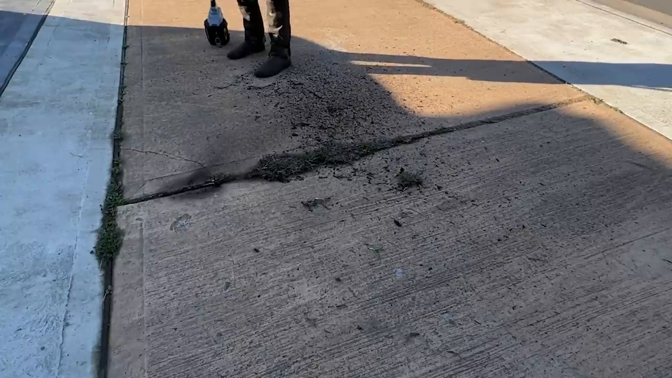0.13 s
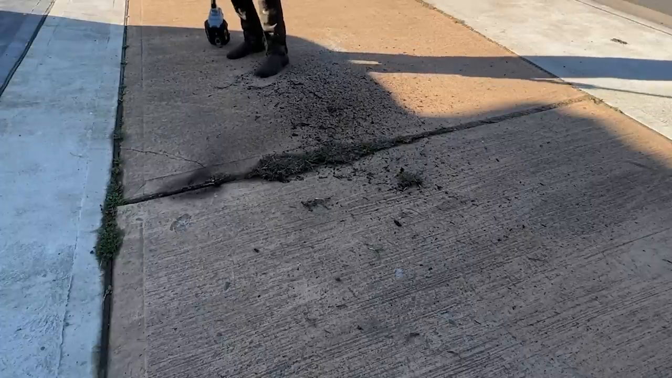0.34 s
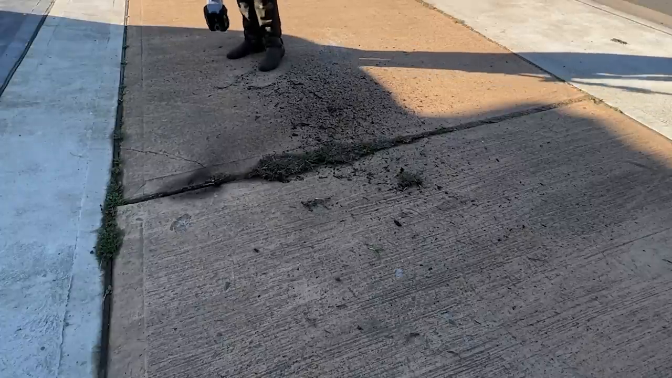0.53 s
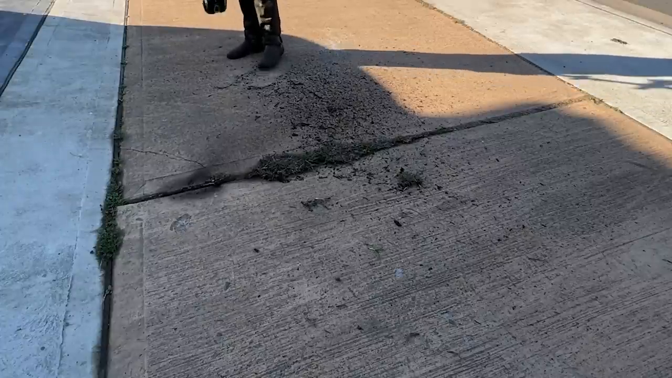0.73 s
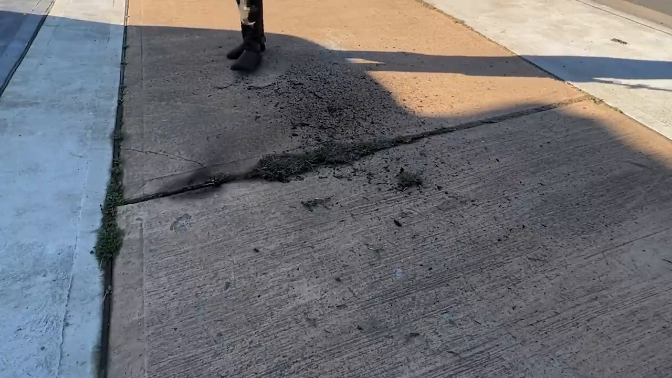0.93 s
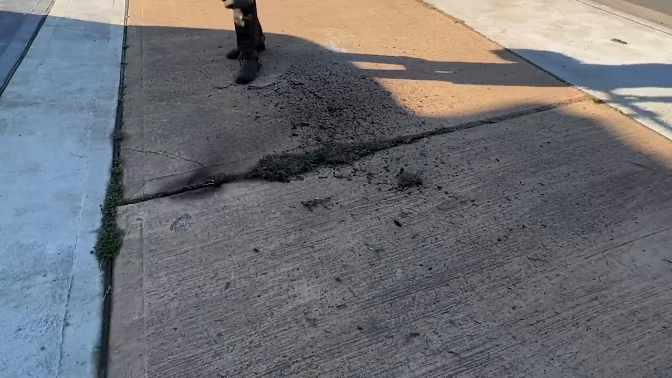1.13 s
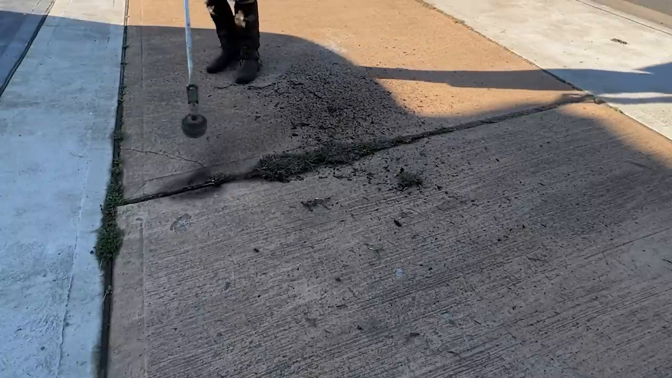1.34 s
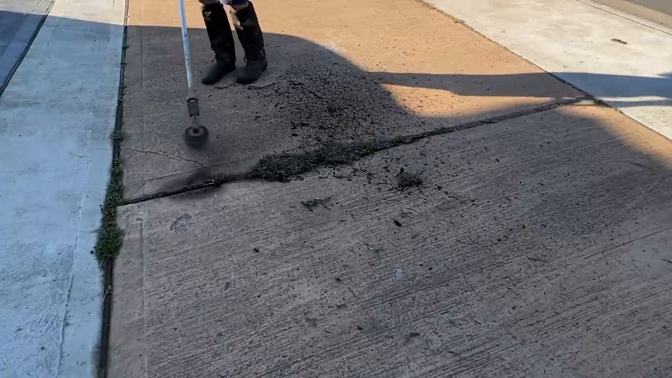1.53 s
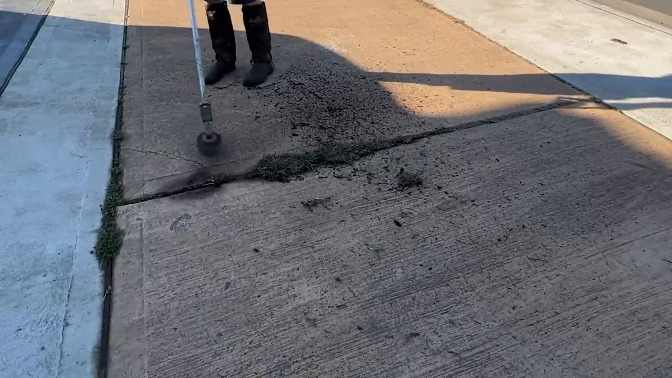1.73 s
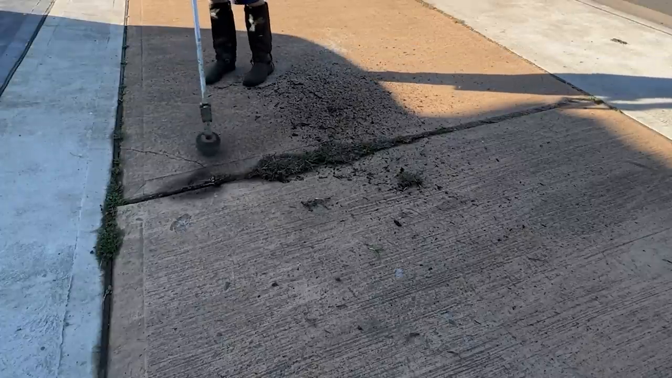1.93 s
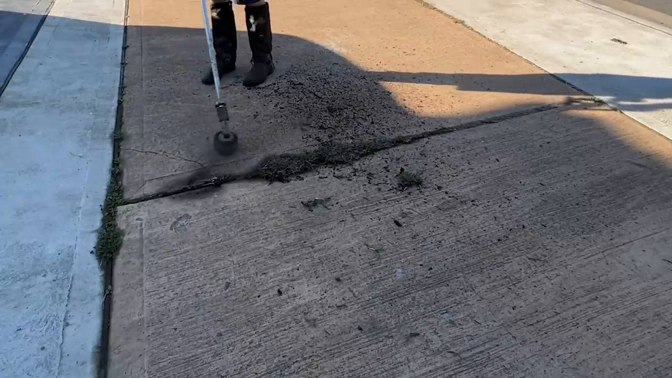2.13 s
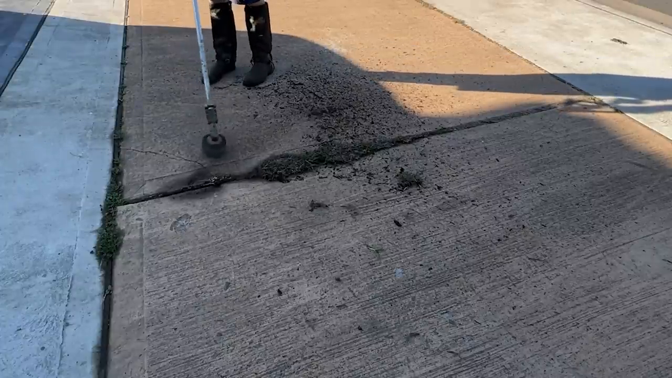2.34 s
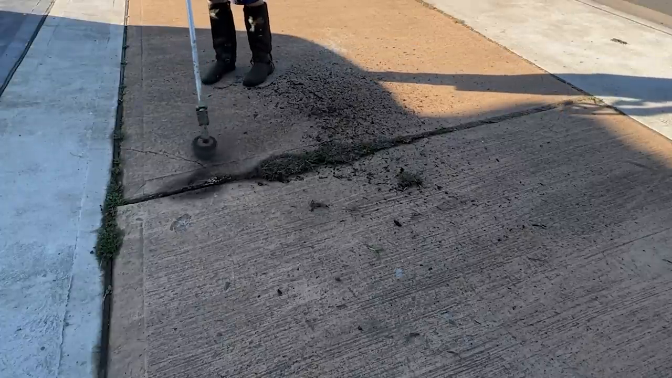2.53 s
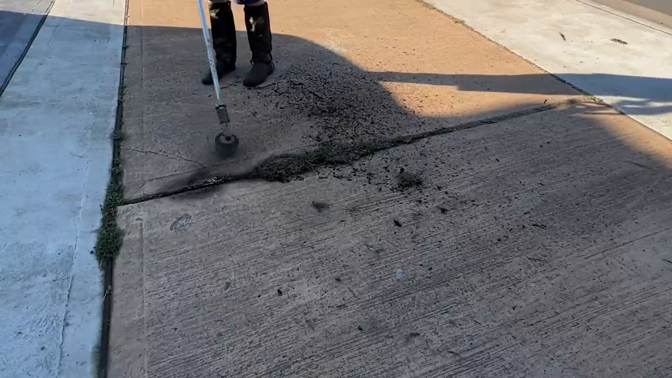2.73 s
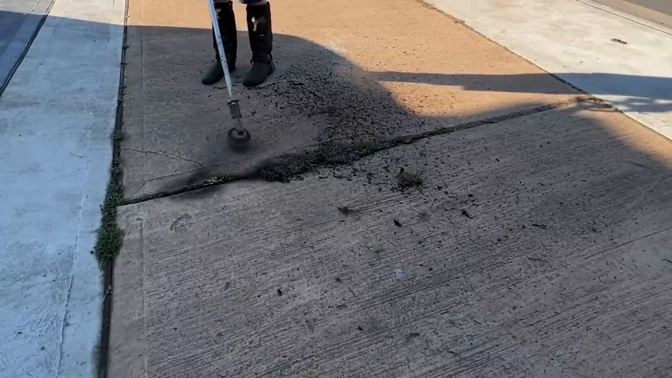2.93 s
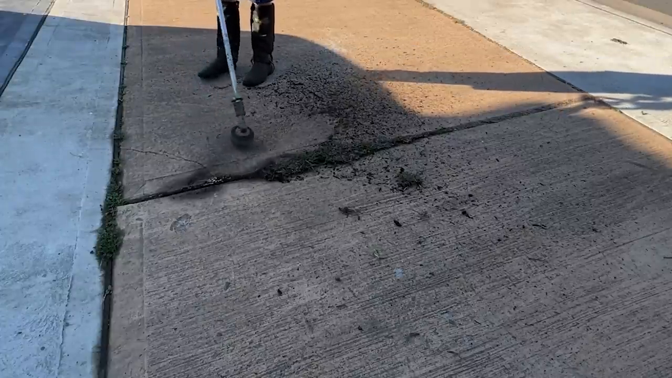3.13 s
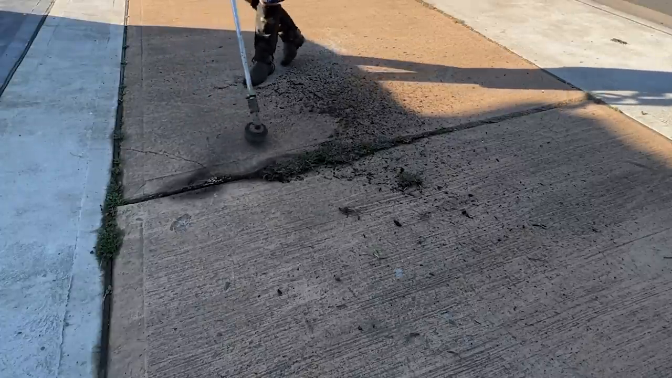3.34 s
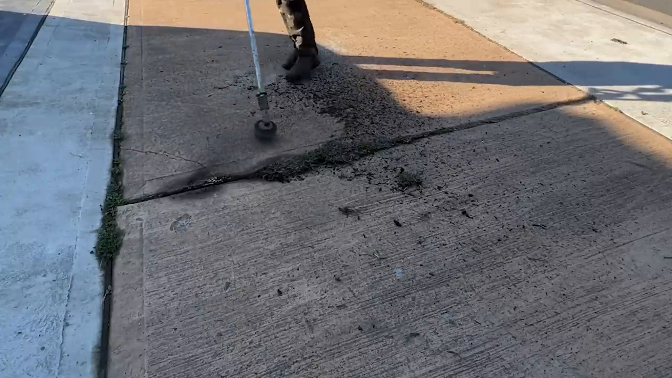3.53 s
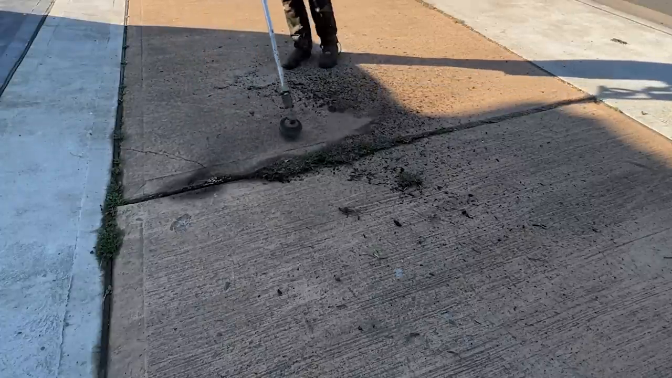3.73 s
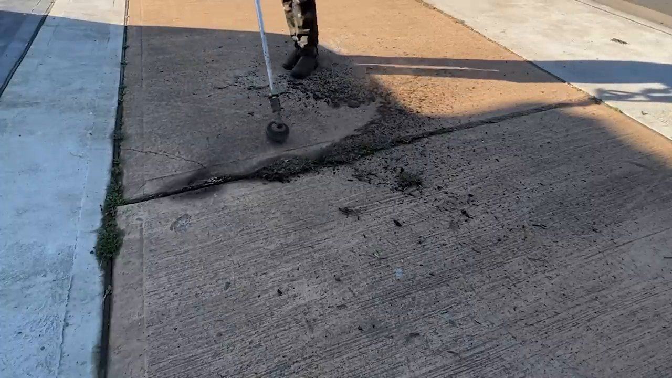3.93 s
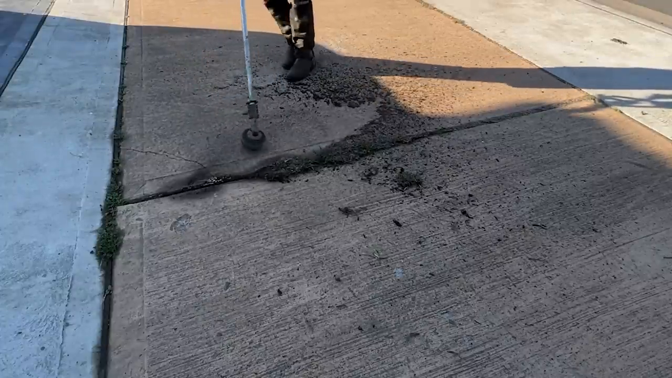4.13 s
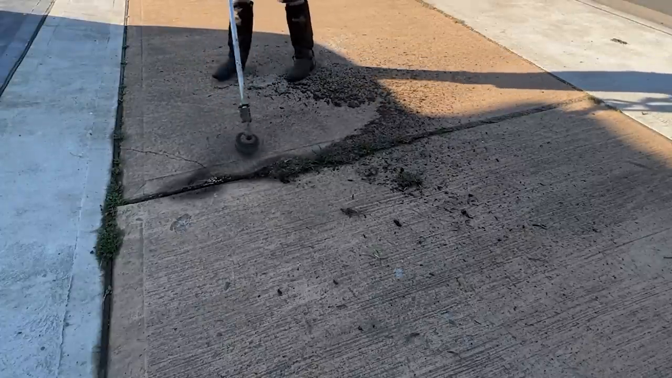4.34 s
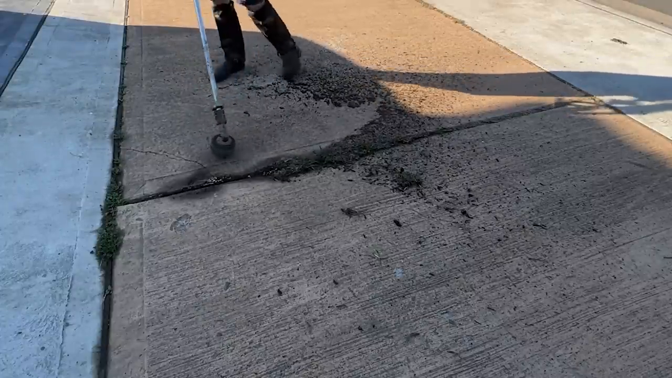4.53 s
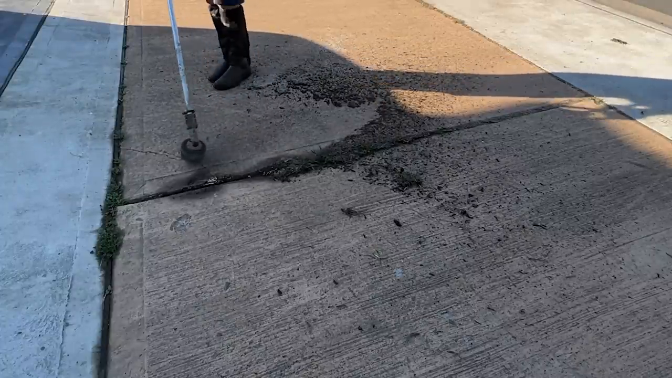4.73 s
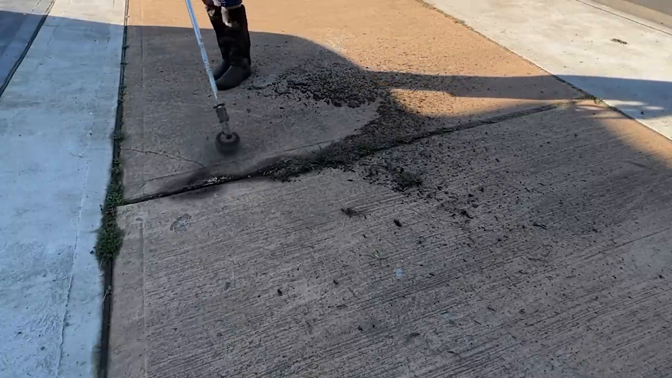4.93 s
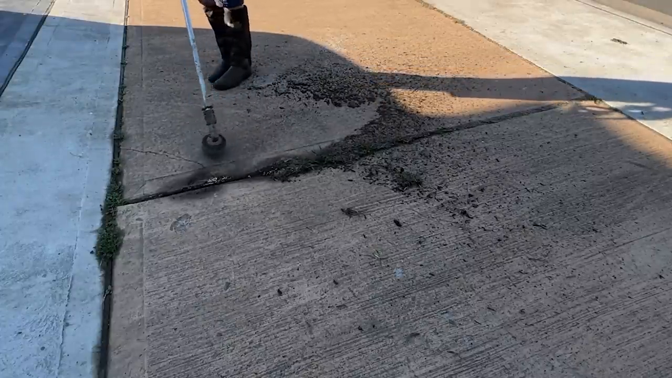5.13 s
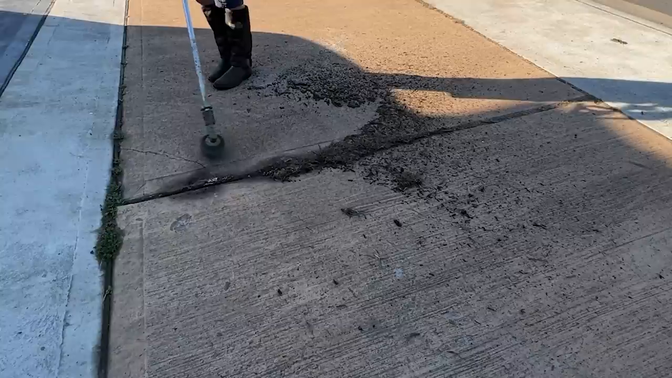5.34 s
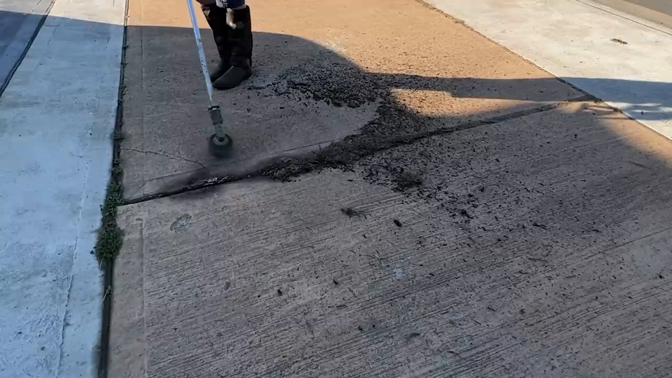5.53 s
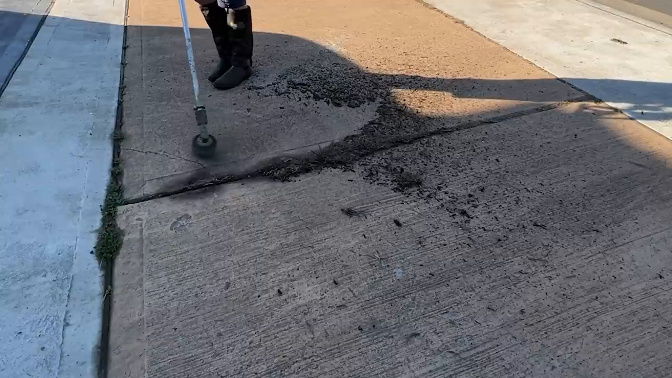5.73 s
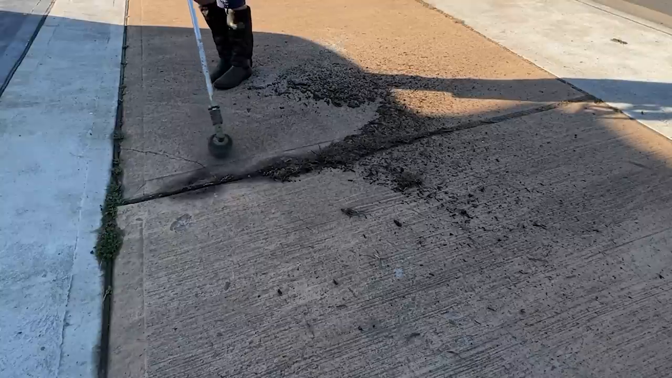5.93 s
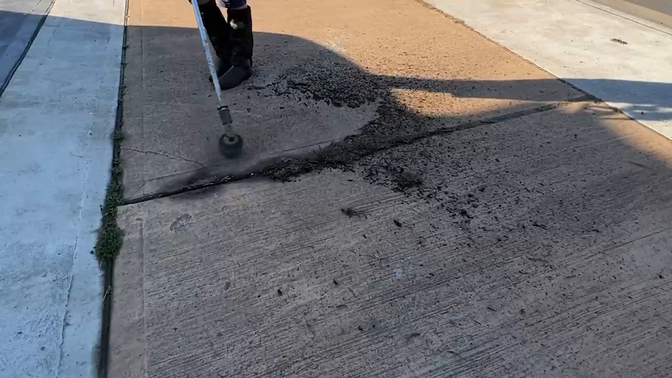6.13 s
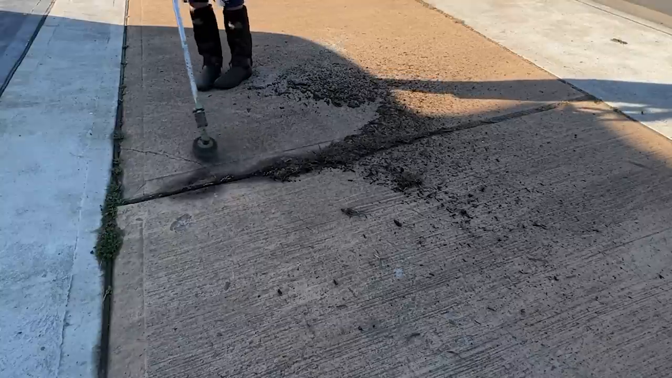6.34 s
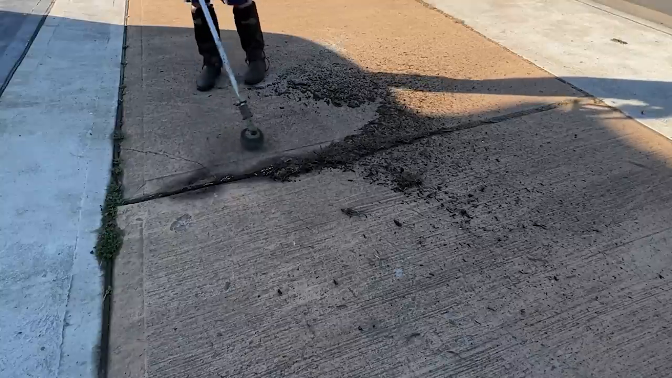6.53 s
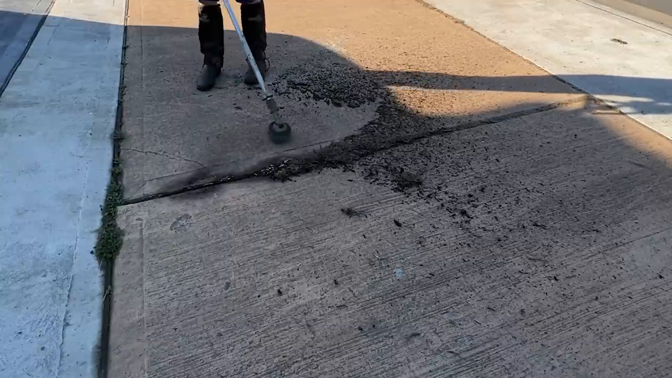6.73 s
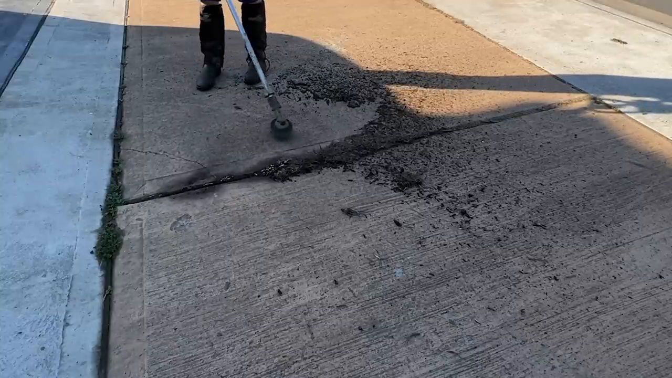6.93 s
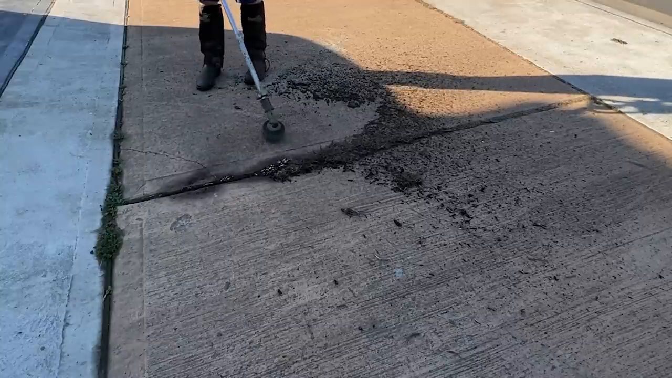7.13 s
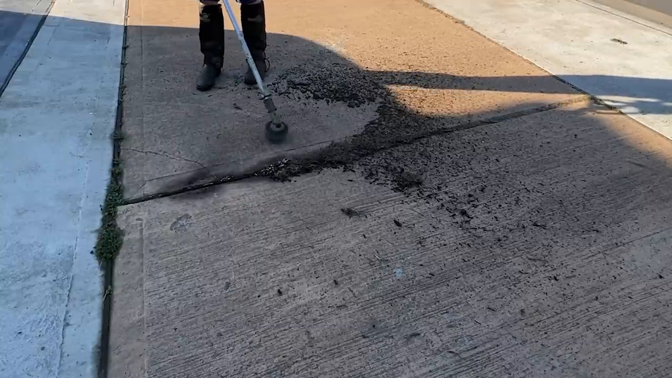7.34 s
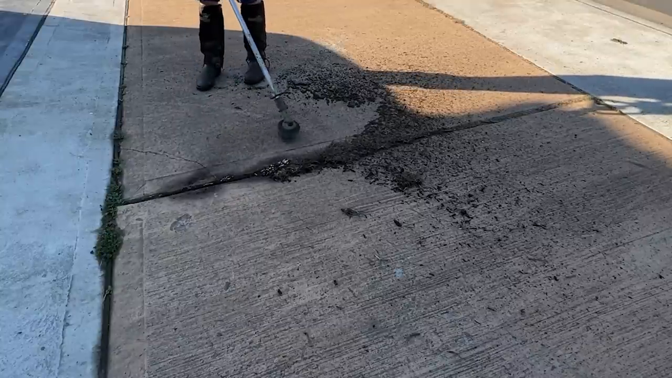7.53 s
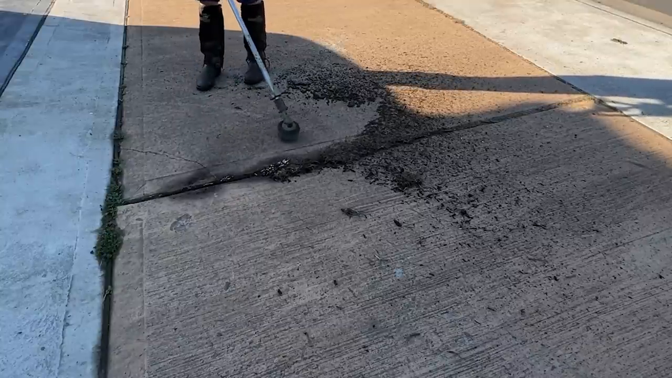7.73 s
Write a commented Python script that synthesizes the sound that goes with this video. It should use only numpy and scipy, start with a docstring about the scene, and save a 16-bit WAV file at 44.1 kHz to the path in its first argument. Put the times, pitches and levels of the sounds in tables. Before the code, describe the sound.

Boots scuff gritty concrete, then an electric string trimmer squeaks, jolts and spins up to a bright hissing whine that flutters as it bites weeds.

```python
"""Electric string trimmer over concrete

Boots shuffle first, as shaped noise; a stalled rotor squeaks and jolts, as short sines and a decaying burst.
The shaft then runs up: gear whine and line drone are sines locked to its phase. The line's vortex whistle
is noise that slides with speed, combed by an echo off the concrete; fan rush and grit are further noise.
Weeds drag the speed down and raise the noise, and a far wash with a low hum lies behind it all."""
import sys
import numpy as np
from scipy import signal
from scipy.io import wavfile
from scipy.ndimage import uniform_filter1d

SR = 44100
rng = np.random.default_rng(int(sys.argv[2]) if len(sys.argv) > 2 else 0)


def log_audio(samples):
    """Write samples as a 16-bit WAV file to the path given in sys.argv[1]."""
    # one column per channel
    frames = np.atleast_2d(samples).T
    # limit to full scale, then quantise
    limited = np.clip(frames, -1, 1)
    pcm = np.round(limited * 32767).astype(np.int16)
    wavfile.write(sys.argv[1], SR, pcm)


N = 343539
HOP = 128  # samples between frames; each frame spans four hops
T = np.arange(N) / SR
FRAME_T = np.arange(N // HOP + 5) * HOP / SR
HZ = np.fft.rfftfreq(4 * HOP, 1 / SR)[:, None]

# Tone and band levels are nominal, before random shaking; spectral densities are relative within each noise.

# Stereo spread, side channel against mid: pitch_hz, side_db
STEREO_WIDTH = [(2200, -65), (2700, -19), (3300, -15), (5500, -13), (9000, -12), (15000, -3)]

# Distant neighbourhood, spectrum: pitch_hz, density_db_per_hz
YARD_SPECTRUM = [(12, -44), (20, 5), (135, -5.5), (357, -10), (841, -7), (1880, -12.5), (2160, -14),
                 (5380, -33), (12400, -45), (15000, -71)]
YARD_LEVEL_DB = -56
# Hum of a distant machine: pitch_hz, level_db
DISTANT_HUM = [(70, -70), (141, -64)]

# Soles dragged on gritty concrete: start_s, loudest_s, end_s, sole_peak_db, crunch_peak_db
SHUFFLES = [(0.0, 0.035, 0.038, -58, -58), (0.04, 0.17, 0.29, -50.5, -63),
            (0.373, .47, 0.583, -46.5, -51.5), (.76, 0.897, 1.05, -53, -60.5)]
SWELL_DB, EDGE_S = -6.5, 0.012  # level at a drag's start and end against its loudest; fade beyond them
# Resonances of the shuffle, each broadened later by 80 Hz: pitch_hz, width_hz, level_db (relative)
SOLE_RINGS = [(544, 54, 2.5), (990, 38, -6), (1790, 76, -3.5), (2500, 83, -27)]
# Crushed grit underfoot, spectrum: pitch_hz, density_db_per_hz
CRUNCH_SPECTRUM = [(1800, -29), (2800, 1.5), (4800, -4), (6500, -12), (9000, -23), (15000, -50)]
# Single grains crushed underfoot: peak_s, pitch_hz, peak_db
GRAIN_TICKS = [(.03, 5600, -61), (.25, 7000, -67), (.367, 5500, -60), (.627, 6160, -63),
               (.752, 3980, -53.5)]
TICK_HALF_S, TICK_SPREAD = 0.0086, 0.29  # half length; half width as a share of pitch

# Stalled rotor squeaking as it breaks loose: peak_s, half_length_s, pitch_hz, peak_db
ROTOR_SQUEAKS = [(1.07, 0.006, 3370, -41), (1.087, 0.0092, 3335, -34.5), (1.107, .007, 3260, -43)]
# Drive taking up its slack, one row: start_s, hold_s, t60_s, level_db
DRIVE_JOLT = (1.068, .017, .1, -45)
# Modes rung by the jolt: pitch_hz, peak_db
KNOCK_MODES = [(1980, -43), (2230, -44)]
KNOCK_S, KNOCK_HALF_S = 1.082, 0.012

# Shaft running up to its free speed: time_s, speed_turns_per_s
RUN_UP = [(1.1, 6.2), (1.16, 33.5), (1.2, 47.4), (1.25, 58.7), (1.4, 80.8), (1.5, 92), (1.55, 100),
          (1.62, 105.7), (1.76, 110.8), (1.97, 118.6), (2.2, 121.6), (2.5, 123.6), (3, 124.8)]
REFERENCE_SPEED = 121  # turns per second at which pace is 1
# Line biting into weeds: time_s, half_length_s, sag_turns_per_s, extra_rush_db
# (the rush peaks earlier and lasts longer than the sag, by the settings below)
WEED_BITES = [(2.5, 0.1, 4.7, 6), (2.72, .07, 1.58, 2), (2.901, 0.11, 6.6, 5), (3.107, 0.08, 6.1, 8.5),
              (3.278, 0.082, 2.56, 8), (3.473, 0.1, 6.1, 11), (3.834, 0.084, 2.16, 0),
              (4.135, 0.12, 4.7, 5.5), (4.391, 0.12, 4.5, 10), (4.549, 0.049, 3.34, 6),
              (4.774, .2, 4.2, 5.5), (5.18, 0.12, 3.2, 4), (5.459, .2, 3.87, 5), (5.743, 0.089, 3.33, 4.5),
              (5.939, 0.062, 3.33, 4), (6.112, .11, 4.3, 10), (6.338, 0.084, 2.2, 5), (6.55, .098, 3.4, 10),
              (6.73, .175, 2.7, 4.5), (6.988, 0.068, 3.84, 8.5), (7.147, 0.11, 5.8, 9), (7.377, 0.11, 6, 6),
              (7.727, 0.14, 2.8, 6)]
SPRAY_LEAD_S, SPRAY_STRETCH, GRIT_SHARE = 0.02, 1.48, 0.81  # grit takes a share of the extra decibels

# Fuzzy gear noise during the run-up: time_s, level_db
WHIRR_LEVEL = [(1.1, -52), (1.15, -53), (1.2, -33), (1.26, -32), (1.32, -43), (1.42, -41), (1.52, -52),
               (1.62, -67), (1.8, -57)]
WHIRR_ORDER, WHIRR_SPREAD = 26.3, 0.066  # multiple of shaft speed; half width as a share of pitch, plus 60 Hz

# Air noise as the head catches, runs up and steadies:
# time_s, whistle_db, rush_db (before the lift below), grit_db; rush and grit also rise at each bite
AIR_LEVELS = [(1.1, -68, -59, -59), (1.14, -50, -67, -38.5), (1.19, -36, -63.5, -40),
              (1.22, -30.5, -58, -37), (1.26, -22.5, -67, -45), (1.35, -24, -53, -52),
              (1.6, -24.5, -51.5, -45.5), (2.1, -24, -57, -45.5), (2.8, -24.5, -60.5, -45)]
RUSH_LIFT_DB = 10.5
# Vortex whistle at reference speed: pitch_hz, density_db_per_hz
WHISTLE_SPECTRUM = [(1500, -32.5), (3600, -16.5), (5400, -5.5), (6500, -3), (7400, 1.5), (8800, -4.5),
                    (10500, -13.5), (13000, -26), (16000, -30), (40000, -56)]
# Slower inner part of the line, relative, lowered further by pace: pitch_hz, density_db_per_hz
INNER_LINE_SPECTRUM = [(2500, -24), (4500, -7.5), (5100, -21), (6000, -16), (7500, -37), (12000, -50)]
# Guard's colouring of the whistle at any speed: pitch_hz, gain_db
GUARD_COLOUR = [(3000, 1), (4500, 0.5), (5050, 2.5), (5700, 0), (6500, 0)]
# Echo off the concrete: time_s, delay_ms, strength (0 to 1)
GROUND_ECHO = [(1.1, 0.31, .05), (1.27, 0.63, 0.26), (1.35, 0.47, 0.4), (1.5, 0.403, 0.38),
               (1.9, 0.37, 0.26), (2.4, 0.38, 0.17), (3, 0.34, 0.23), (3.6, 0.38, 0.1), (4.2, 0.37, 0.1),
               (4.6, 0.36, 0.01), (4.8, 0.34, 0.22), (5.4, 0.348, 0.36), (6, 0.35, 0.26), (6.5, 0.34, 0.31),
               (7.1, 0.35, 0.4), (7.79, 0.35, 0.31)]
# Motor fan rush at reference speed: pitch_hz, density_db_per_hz
RUSH_SPECTRUM = [(700, -31.5), (1300, -14.5), (1700, 1), (1950, 2.5), (2200, -6.5), (2500, 1), (3300, 3.5),
                 (4000, 4), (6000, -20), (15000, -68)]
# Grit and weeds blown about: pitch_hz, density_db_per_hz
GRIT_SPECTRUM = [(25, -40), (60, -23.5), (150, -24), (300, -5.5), (600, -2), (1100, -5.5), (1600, -1),
                 (3000, -9.5), (8000, -27.5)]

# Spells in which a strong gear order sings out as the casing turns: order, start_s, end_s, level_db
WHINE_SPELLS = [(15, 1.8, 2.56, -39.5), (15, 2.72, 3.3, -37.5), (15, 3.4, 3.54, -36.5),
                (15, 3.63, 4.0, -41), (15, 4.1, 4.9, -38.5), (15, 4.99, 5.46, -37.5), (15, 5.55, 5.7, -37),
                (15, 5.89, 6.27, -38), (15, 6.52, 6.74, -35), (15, 6.85, 7.6, -36), (15, 7.7, 7.78, -35.5),
                (16, 1.62, 2.1, -31.5), (16, 2.2, 2.5, -40), (16, 2.6, 3.0, -35), (16, 3.02, 3.38, -36.5),
                (16, 3.39, 3.55, -34), (16, 3.6, 3.95, -42), (16, 4.05, 4.18, -38), (16, 4.35, 4.72, -38.5),
                (16, 4.74, 5.78, -35), (16, 5.92, 6.02, -32), (16, 6.1, 6.3, -38.5),
                (16, 6.49, 6.58, -33.5), (16, 6.66, 6.88, -38.5), (16, 6.9, 7.52, -33.5)]
WHINE_REST_DB, WHINE_FADE_S = -48.5, 0.034
ORDER_17_DB, ORDER_17_PER_SAG_DB = -61, 3.0  # running free; rise for each turn per second of sag
# Fainter upper orders, before the trims below: time_s, orders_27_28_db, orders_29_30_db
UPPER_ORDERS = [(1.6, -53, -54), (2.3, -47, -42), (2.9, -51, -44.5), (4.3, -44, -42), (5.9, -42, -42),
                (6.8, -41, -52), (7.3, -34, -40), (7.79, -45, -45)]
# Trim of orders 27 to 30, with UPPER_DROP_DB common to all: trim_db
UPPER_TRIM_DB = [-2, -5.5, -9, -2]
UPPER_DROP_DB = 8
# Orders sweeping a casing mode: order, mode_hz, width_hz, peak_db
CASING_SWEEPS = [(24, 2030, 170, -39), (17, 1720, 130, -36), (29, 2700, 220, -42), (27, 2350, 200, -42)]

PASSES_PER_TURN = 1.685  # line ends passing for each shaft turn
# Spells in which a harmonic of the passing line ends stands out: harmonic, start_s, end_s, level_db
DRONE_SPELLS = [(1, 1.7, 1.82, -52.5), (2, 1.62, 1.8, -51.5), (1, 2.1, 2.7, -59.5), (1, 3.55, 4.15, -54),
                (1, 4.85, 5.2, -56), (1, 5.7, 5.95, -53.5), (1, 6.15, 6.35, -56), (1, 6.45, 6.95, -51),
                (1, 7.1, 7.78, -50), (2, 1.9, 2.35, -53), (2, 2.62, 3.1, -47.5), (2, 3.15, 3.3, -52),
                (2, 3.6, 4.0, -50), (2, 4.6, 5.28, -52.5), (2, 6.05, 6.2, -50.5), (2, 6.45, 6.72, -49),
                (2, 6.9, 7.6, -54), (3, 1.97, 2.2, -55.5), (3, 2.92, 3.15, -51.5), (3, 3.55, 3.95, -51),
                (3, 4.05, 4.27, -49.5), (3, 4.65, 4.9, -49), (3, 5.05, 5.27, -50), (3, 5.78, 5.92, -47.5),
                (3, 6.45, 6.97, -48), (3, 7.05, 7.55, -50.5)]
DRONE_REST_DB, DRONE_FADE_S = -69.5, 0.018
DRONE_LAG_S = 0.404  # the drone's pitch follows the sag smoothed over this span
# Upper harmonics of the passing line ends: harmonic, level_db
UPPER_PASSES = [(4, -61), (5, -66.5), (6, -60.5), (7, -60.5), (8, -63)]

BAND_EDGE_HZ = 15710


def gain_of(db):
    """Decibel law: amplitude ratio from a level."""
    return 10 ** (np.asarray(db) / 20)


def read(points, hz):
    """Logarithmic interpolation of a spectrum over frequency."""
    f, value = np.transpose(points)
    return np.interp(np.log(hz + 1), np.log(f + 1), value)


def curves(rows, t):
    """Linear interpolation of every column over time."""
    s, *columns = np.transpose(rows)
    return [np.interp(t, s, column) for column in columns]


def evened(x):
    """Normalization to unit rms."""
    return x / np.sqrt(np.mean(abs(x) ** 2) + 1e-20)


def bump(t, s, half):
    """Gaussian pulse, falling to 1/e at the half length."""
    return np.exp(-((t - s) / half) ** 2)


def bump_db(s, half):
    """Gaussian pulse as a level per frame, floored near -100 dB."""
    return 20 * np.log10(bump(FRAME_T, s, half) + 1e-5)


def spells(rows, which, rest_db, fade_s):
    """Amplitude envelope of one partial: at rest between its spells, fading in and out of each."""
    levels = [np.interp(FRAME_T, [start - fade_s, start, end, end + fade_s], [rest_db, db, db, rest_db])
              for k, start, end, db in rows if round(k) == which]
    return np.max(levels, axis=0)


def air(shape, level_db, patchy_db, flicker_db):
    """Turbulent noise: random short-time spectra under a given shape and level, patchy and flickering."""
    draws = rng.standard_normal((len(level_db), len(HZ), 5), np.float32).T
    mid_re, mid_im, side_re, side_im, patches = draws
    patches = uniform_filter1d(patches, size=6, axis=0)
    patches = evened(uniform_filter1d(patches, size=12, axis=1))
    flicker = evened(uniform_filter1d(rng.standard_normal(len(level_db)), size=12))
    wander_db = patchy_db * patches + flicker_db * flicker
    size = shape / np.sqrt((shape ** 2).sum(0)) * gain_of(level_db + wander_db)
    mid = (mid_re + 1j * mid_im) * size
    side = (side_re + 1j * side_im) * size * gain_of(read(STEREO_WIDTH, HZ))
    spectra = np.array([mid + side, mid - side])
    out = signal.istft(spectra, nperseg=4 * HOP, noverlap=3 * HOP)[1][:, :N]
    # the root restores the level lost in overlapping independent frames
    return np.sqrt(3 / 2) * np.pad(out, ((0, 0), (0, N - out.shape[1])))


def tone(turns, db, rough, smooth_s):
    """Random modulation of a sine: a phase in turns and a level per frame, both shaken."""
    frames = max(int(smooth_s * SR / HOP), 1)
    a, b = uniform_filter1d(rng.standard_normal((2, len(FRAME_T))), frames)
    shaken = 1 + rough * (evened(a) + 1j * evened(b))
    size = gain_of(db) * abs(shaken)
    shift = np.unwrap(np.angle(shaken)) + 2 * np.pi * rng.random()
    phase = 2 * np.pi * turns + np.interp(T, FRAME_T, shift)
    return np.sqrt(2) * np.interp(T, FRAME_T, size) * np.cos(phase)


def sag(t):
    """Loading of the shaft: turns per second lost to the weeds."""
    return sum(lost * bump(t, s, half) for s, half, lost, _ in WEED_BITES)


def speed(t):
    """Loaded rotation: run-up speed less the sag, in turns per second."""
    return curves(RUN_UP, t)[0] - sag(t)


def yard():
    """Diffuse background: a far broadband wash and a low hum, both falling by 9 dB."""
    fade_db = np.interp(FRAME_T, [1.3, 1.7], [0, -9])
    hum = sum(tone(hz * T, db + fade_db, rough=0.29, smooth_s=0.06) for hz, db in DISTANT_HUM)
    shape = gain_of(read(YARD_SPECTRUM, HZ))
    return hum + air(shape, YARD_LEVEL_DB + fade_db, patchy_db=2.5, flicker_db=1.0)


def boots():
    """Sliding friction: dragged soles excite resonances, and crushed grit adds bright noise and ticks."""
    t = FRAME_T[FRAME_T < DRIVE_JOLT[0]]
    drags = []
    for start, top, end, sole_peak_db, crunch_peak_db in SHUFFLES:
        times = [start - EDGE_S, start, top, end, end + EDGE_S]
        swell_db = np.interp(t, times, [-40, SWELL_DB, 0, SWELL_DB, -40])
        drags.append(swell_db + [[sole_peak_db], [crunch_peak_db]])
    sole_db, crunch_db = np.max(drags, axis=0)

    ticks = 0
    for s, hz, db in GRAIN_TICKS:
        band = 1 / (1 + ((HZ - hz) / (TICK_SPREAD * hz)) ** 4)
        level_db = db + bump_db(s, TICK_HALF_S)[:len(t)]
        ticks = ticks + air(band, level_db, patchy_db=1.0, flicker_db=0.5)

    broad = gain_of(read([(200, -23), (400, -13), (2000, -4.5), (3000, -21), (8000, -60)], HZ))
    rings = sum(gain_of(db) / (1 + (2 * (HZ - hz) / (width + 80)) ** 2) for hz, width, db in SOLE_RINGS)
    sole = air(broad + rings, sole_db, patchy_db=1.2, flicker_db=0.8)
    crunch = air(gain_of(read(CRUNCH_SPECTRUM, HZ)), crunch_db, patchy_db=1.2, flicker_db=1.2)
    return ticks + sole + crunch


def start():
    """Stick-slip and impact: the rotor squeaks loose, and the drive's jolt gives a burst and rings modes."""
    squeak = sum(tone(hz * T, db + bump_db(s, half), rough=0.12, smooth_s=0.004)
                 for s, half, hz, db in ROTOR_SQUEAKS)
    knock = sum(tone(hz * T, db + bump_db(KNOCK_S, KNOCK_HALF_S), rough=0.22, smooth_s=0.004)
                for hz, db in KNOCK_MODES)
    s, hold_s, t60_s, jolt_db = DRIVE_JOLT
    after = FRAME_T[FRAME_T < s + 0.2] - s
    decay_db = jolt_db - 60 * np.maximum(after - hold_s, 0) / t60_s
    level_db = np.where(after > 0, decay_db, -120)
    colour = gain_of(read([(200, -9), (1200, 3.0), (2100, -6), (2600, -6), (8000, -28)], HZ))
    return squeak + knock + air(colour, level_db, patchy_db=4, flicker_db=4.0)


def whirr(pace):
    """Order-tracking noise: the straining gears give a fuzzy band that climbs with the shaft."""
    t = FRAME_T[FRAME_T < WHIRR_LEVEL[-1][0]]
    pace = pace[:len(t)]
    centre = WHIRR_ORDER * REFERENCE_SPEED * pace + 300 * (1 - pace) ** 2
    band = 1 / (1 + ((HZ - centre) / (WHIRR_SPREAD * centre + 60)) ** 2)
    rasp = 0.15 / (1 + (HZ / 5500) ** 6)
    level_db = np.where(t > WHIRR_LEVEL[0][0], curves(WHIRR_LEVEL, t)[0], -120)
    return air(band + rasp, level_db, patchy_db=3.5, flicker_db=2)


def line_whistle(pace, level_db):
    """Vortex shedding and comb interference: pitch scales with speed, and the ground echo combs it."""
    delay_ms, strength = curves(GROUND_ECHO, FRAME_T)
    comb = abs(1 + np.clip(strength, 0, 1) * np.exp(-2j * np.pi * HZ * delay_ms / 1000))
    outer = gain_of(read(WHISTLE_SPECTRUM, HZ / pace))
    inner = gain_of(read(INNER_LINE_SPECTRUM, HZ / pace) - 8.7 * (1.5 - pace))
    shape = np.hypot(outer, inner) * comb * gain_of(read(GUARD_COLOUR, HZ))
    return air(shape, level_db, patchy_db=1.92, flicker_db=0.5)


def air_noise(pace):
    """Flow noise: line whistle, motor fan rush and blown grit, the last two louder at each bite."""
    levels_db = np.where(FRAME_T > AIR_LEVELS[0][0], curves(AIR_LEVELS, FRAME_T), -120)
    whistle_db, rush_db, grit_db = levels_db
    spray_db = np.max([db * bump(FRAME_T, s - SPRAY_LEAD_S, SPRAY_STRETCH * half)
                       for s, half, _, db in WEED_BITES], axis=0)
    rush_db = rush_db + spray_db + RUSH_LIFT_DB
    grit_db = grit_db + GRIT_SHARE * spray_db
    whistle = line_whistle(pace, whistle_db)
    rush = air(gain_of(read(RUSH_SPECTRUM, HZ / pace)), rush_db, patchy_db=2.5, flicker_db=1.85)
    grit = air(gain_of(read(GRIT_SPECTRUM, HZ)), grit_db, patchy_db=2.5, flicker_db=0.7)
    return whistle + rush + grit


def gears(turns, on_db):
    """Gear orders: multiples of shaft speed, one rising under load and some sweeping casing modes."""
    strong = sum(tone(k * turns, on_db + spells(WHINE_SPELLS, k, WHINE_REST_DB, WHINE_FADE_S),
                      rough=0.37, smooth_s=0.02) for k in (15, 16))
    loaded_db = ORDER_17_DB + ORDER_17_PER_SAG_DB * sag(FRAME_T)
    loaded = tone(17 * turns, on_db + loaded_db, rough=0.5, smooth_s=0.05)

    # each column of levels serves two neighbouring orders
    upper_db = np.repeat(curves(UPPER_ORDERS, FRAME_T), 2, axis=0) + np.c_[UPPER_TRIM_DB] - UPPER_DROP_DB
    upper = sum(tone(k * turns, on_db + db, rough=1.8, smooth_s=0.025)
                for k, db in zip(range(27, 31), upper_db))

    sweeps = 0
    for k, hz, width, db in CASING_SWEEPS:
        detuning = 2 * (k * speed(FRAME_T) - hz) / width
        mode_db = -20 * np.log10(1 + detuning ** 2)
        sweeps = sweeps + tone(k * turns, db + mode_db, rough=0.92, smooth_s=0.015)
    return strong + loaded + upper + sweeps


def line_passes(on_db):
    """Blade-passing tone: each line end pushes air once a pass, a low harmonic drone that comes and goes."""
    slow_sag = uniform_filter1d(sag(T), int(DRONE_LAG_S * SR))
    passes = PASSES_PER_TURN * np.cumsum(curves(RUN_UP, T)[0] - slow_sag) / SR
    low = sum(tone(k * passes, on_db + spells(DRONE_SPELLS, k, DRONE_REST_DB, DRONE_FADE_S),
                   rough=0.28, smooth_s=0.03) for k in (1, 2, 3))
    high = sum(tone(k * passes, on_db + db, rough=1.0, smooth_s=0.077) for k, db in UPPER_PASSES)
    return low + high


def scene():
    """Superposition of all sources, the rotating ones driven by one shaft."""
    turns = np.cumsum(speed(T)) / SR
    pace = speed(FRAME_T) / REFERENCE_SPEED
    on_db = 60 * np.log10(np.minimum(pace / 1.05, 1))  # tones emerge as the shaft nears its free speed
    background = yard() + boots()
    motor = start() + whirr(pace) + gears(turns, on_db)
    return background + motor + air_noise(pace) + line_passes(on_db)


def record(dry):
    """Transducer limits: the microphone's bass roll-off and soft overload, then a band limit."""
    thinned = signal.sosfilt(signal.butter(1, 50, "high", fs=SR, output="sos"), dry)
    mid = thinned.mean(0)  # the overload acts on the centre signal
    rounded = thinned - mid + 0.35 * np.tanh(mid / 0.35)
    band_limit = signal.firwin(1023, BAND_EDGE_HZ, window=("kaiser", 9), fs=SR)
    return signal.oaconvolve(rounded, band_limit[None], "same")


dry = scene()
out = record(dry)
log_audio(out)
```